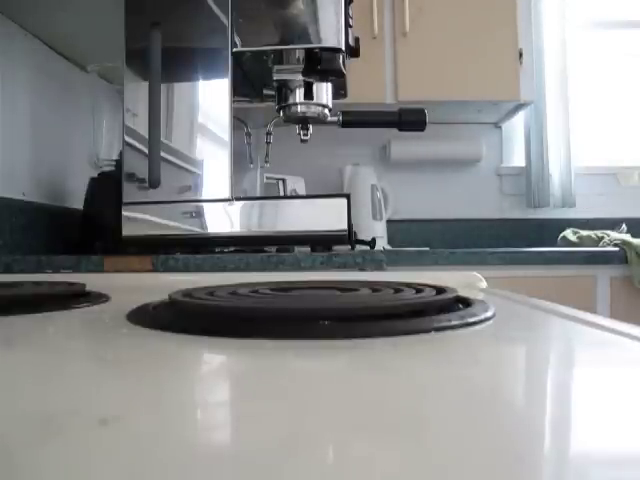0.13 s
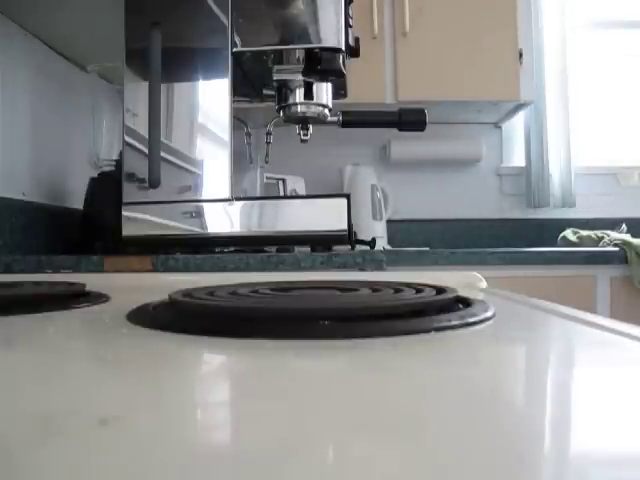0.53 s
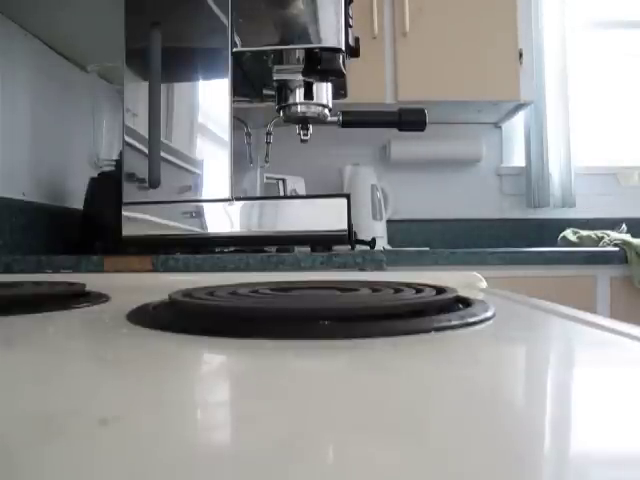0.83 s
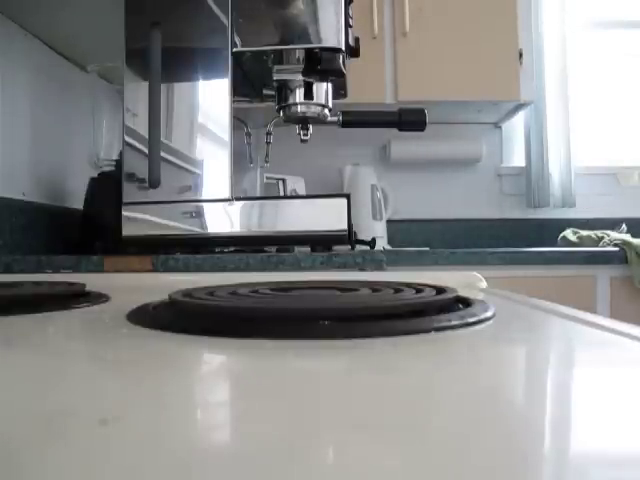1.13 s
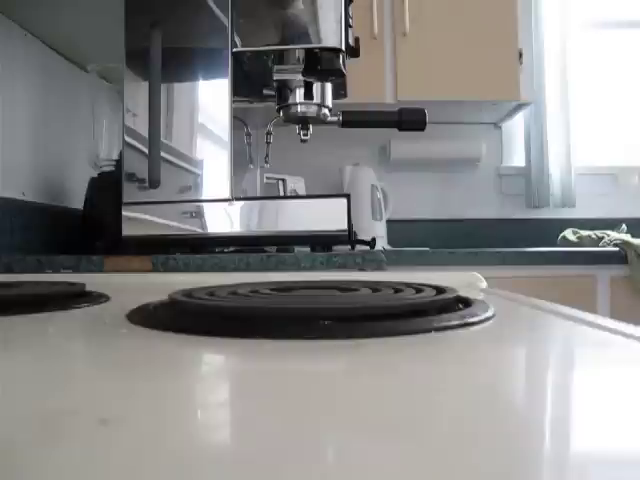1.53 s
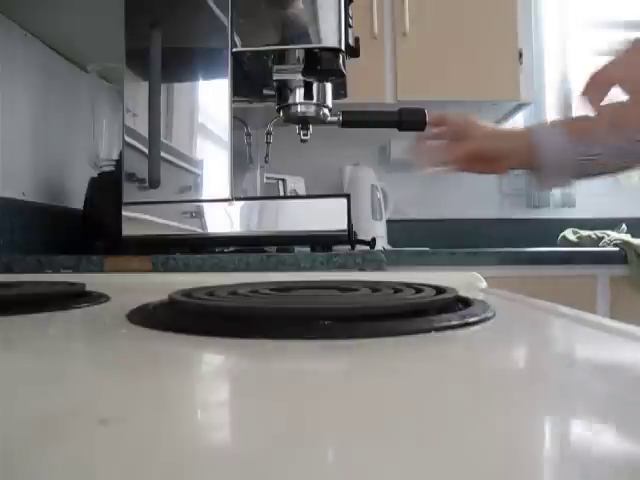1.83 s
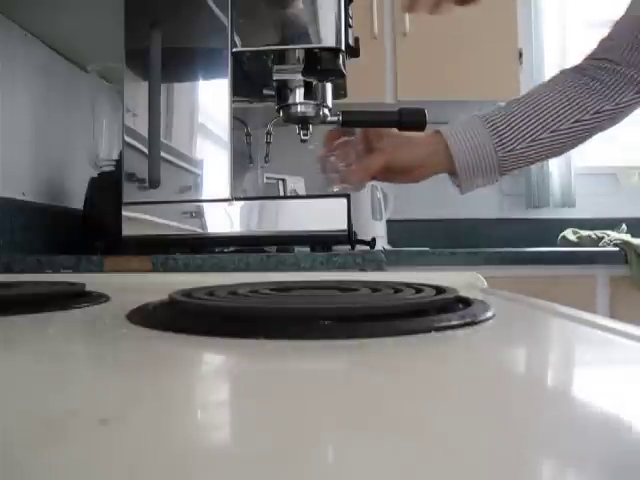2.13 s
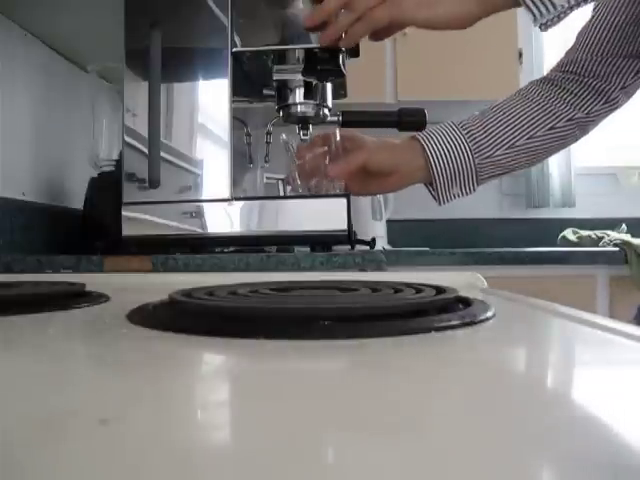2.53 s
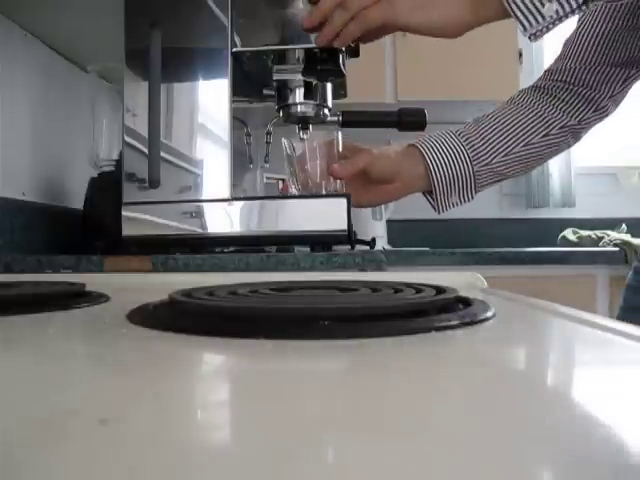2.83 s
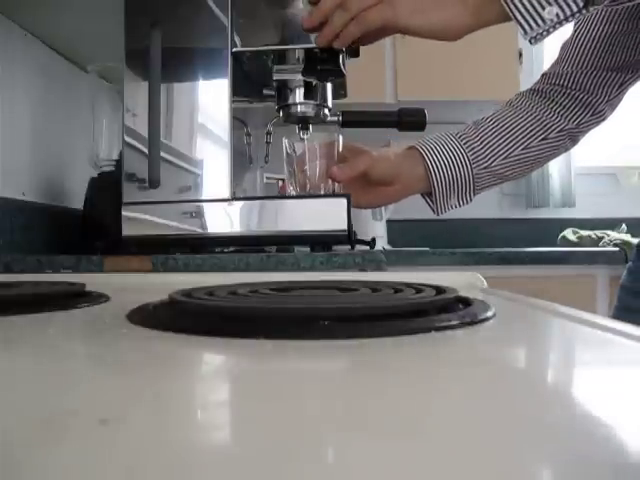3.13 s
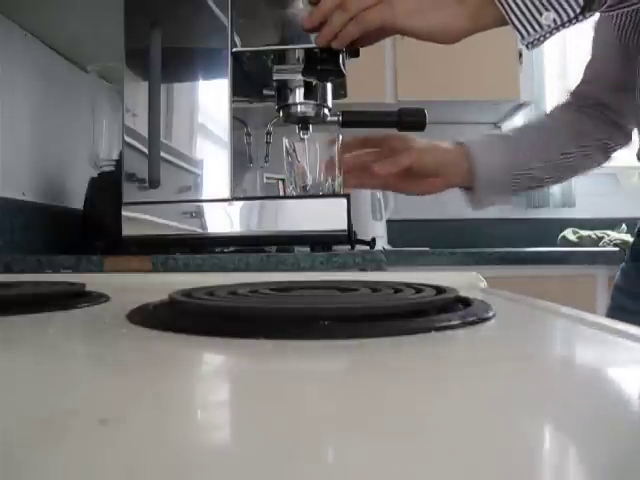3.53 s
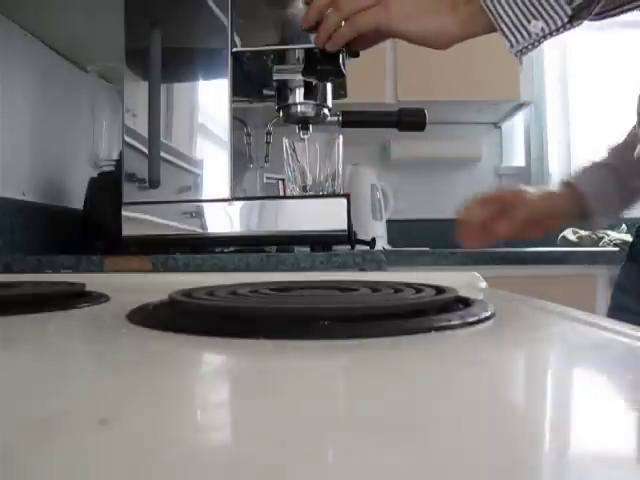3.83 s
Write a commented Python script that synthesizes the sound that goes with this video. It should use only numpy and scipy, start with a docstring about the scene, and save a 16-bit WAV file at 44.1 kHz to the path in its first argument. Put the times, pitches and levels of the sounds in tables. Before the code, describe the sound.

An espresso machine starts near the end of a quiet kitchen scene. Steady room hum with a thin appliance whine runs throughout. Faint shoe scuffs come early, clearest at 0.7-0.8 s, then soft steps and rustles until 2.3. At 2.57 a glass clinks brightly on metal; at 2.78 it lands with a hard, clattering knock. At 3.71 a switch snaps, a valve hisses, and from 3.75 a loud, rough pump buzz holds to the end.

```python
"""An espresso machine starts: a switch snaps, a valve hisses, and a motor hums on its shaft orders while
noise shaped by the casing throbs twice a turn. Before that someone shuffles up, clinks a glass on metal
and sets it on the drip tray: decaying modes give the ringing, coloured impulses and noise the contacts.
Behind them lie a steady kitchen hum of coloured noise and a thin appliance whine of wavering tones."""
import sys
import numpy as np
from scipy import signal
from scipy.fft import rfft, irfft
from scipy.io import wavfile

SR = 44100
rng = np.random.default_rng(int(sys.argv[2]) if len(sys.argv) > 2 else 0)


def to_wav(s):
    """Save 16-bit WAV."""
    ch = np.atleast_2d(s).T  # columns
    pcm = np.round(np.clip(ch, -1, 1) * 32767)  # PCM
    wavfile.write(sys.argv[1], SR, pcm.astype(np.int16))


N = 176400
TIME = np.arange(N) / SR  # s

# Every colour is a relative spectrum: its noise is scaled to rms 1 and its knocks to unit energy.
# Strong orders of the pump shaft: [multiple of the shaft rate, relative level/dB]
SHAFT_ORDERS = [(2, -57), (4, -49.5), (7, -51.5), (10, -51), (13, -52), (16, -61), (20, -51.5), (22, -52),
                (24, -50.5), (30, -54), (31, -56), (40, -59), (64, -49), (66, -43)]
# Response of the casing to the pump: [f/Hz, relative level/dB]
CASING_COLOUR = [(50, -24), (130, -13), (400, -6.5), (700, -5), (810, -8), (915, 4.5), (1060, -7),
                 (1220, 4), (1450, -22), (1750, -6), (1970, -4), (2120, -11), (2800, -8.5), (3600, -22),
                 (5800, -10), (10000, -29), (15000, -45)]
# Hiss of the valve against time: [t/s, level/dB]; its spectrum: [f/Hz, relative level/dB]
VALVE_LEVEL = [(3.713, -70), (3.72, -29.5), (3.755, -32), (3.775, -29.5), (3.82, -34), (3.87, -38.5),
               (4.0, -40)]
VALVE_SPECTRUM = [(300, -14), (1000, -5), (2800, -7), (3600, -8.5), (4600, -4.5), (5300, -8), (5850, -2.5),
                  (6500, -10), (8000, 0.5), (9800, -0.5), (10800, -7.5), (11800, -31), (13200, -17),
                  (16000, -32)]
# Contacts of the pump switch: [t/s, relative level/dB]; their spectrum: [f/Hz, relative level/dB]
SWITCH_CONTACTS = [(3.712, -18), (3.7134, -8), (3.714, -14.5), (3.7161, -14)]
SWITCH_COLOUR = [(200, -34), (1000, -13.5), (2800, -9), (3900, -10), (4800, 3.5), (6000, -9.5), (7500, -4),
                 (9500, 5), (10800, -3), (11900, -33), (13500, -11), (16000, -27)]
# Modes of the glass: [f/Hz, relative level/dB, t60/s]
GLASS_MODES = [(2229, -24.5, .19), (2278, -23.5, .33), (2339, -28, .2), (4451, -36, .34), (4490, -37, .18),
               (4535, -36, .18), (6974, -29.5, .24), (7051, -35, .22), (9800, -31, .13), (9836, -28.5, .19),
               (9915, -35, .13), (10160, -39, .2), (13142, -54, .14)]
# Modes of the metal spout that the glass first touches, led by a low thump of the machine casing near 117 Hz:
# [f/Hz, relative level/dB, t60/s]
SPOUT_MODES = [(117, -51, 0.36), (210, -40.5, .3), (492, -43.5, 0.29), (718, -35, 0.13), (783, -37.5, 0.28),
               (940, -38, 0.078), (990, -33, 0.11), (1090, -39, 0.053), (1245, -30.5, 0.084)]
# Contact noise of glass on spout: [f/Hz, relative level/dB]
CONTACT_COLOUR = [(80, -15), (300, -6.5), (800, 4.5), (1250, -4), (1600, -23), (2400, 4.5), (3500, -24),
                  (4500, 3), (5800, -25), (10000, -14), (12000, -38), (16000, -44)]
# The base of the glass lands and rocks on the tray: [t/s, relative level/dB]
BASE_LANDINGS = [(2.7811, -1), (2.7822, -1.5), (2.7852, 2.5), (2.791, -2.5)]
# Modes of the drip tray: [f/Hz, relative level/dB, t60/s]
TRAY_MODES = [(442, -47.5, .35), (1040, -38, 0.028), (1116, -24.5, 0.084), (1363, -34.5, .12),
              (1770, -28, 0.047), (2530, -43, .2), (2745, -37, .3), (4334, -39, .3), (5070, -46, 0.24)]
# Contact noise of glass on tray: [f/Hz, relative level/dB]
TRAY_CONTACT_COLOUR = [(70, -23), (200, -10), (480, 0.5), (700, -8), (1100, 1), (1500, -0.5), (2100, 1),
                       (2900, -0.5), (3800, -7), (4600, -5.5), (6200, -13), (8000, -7.5), (9800, -6),
                       (11000, -13.5), (12000, -28), (16000, -26)]
# Shoe scuffs: [start t/s, rise/s, decay/s, level/dB]; their spectrum: [f/Hz, relative level/dB]
SHOE_SCUFFS = [(0, 0.0018, 0.035, -48), (.16, 0.044, 0.043, -47), (.21, 0.044, 0.058, -49.5),
               (.70, .018, 0.015, -40), (.779, 0.0092, 0.014, -34)]
SHOE_COLOUR = [(200, -23), (700, -12), (1200, -6), (1500, -0.5), (1650, 0.5), (2100, -3), (2800, -9.5),
               (3600, -8.5), (4500, -7), (5600, -9.5), (6500, -19), (10000, -19), (12000, -46),
               (16000, -40)]
# Soft steps and floor creaks: [start t/s, rise/s, decay/s, level/dB]; spectrum: [f/Hz, relative level/dB]
SOFT_STEPS = [(1.01, 0.032, .035, -47.5), (1.14, 0.0053, 0.0091, -50), (1.661, .006, 0.021, -38.5),
              (1.86, 0.0036, 0.0065, -50), (2.0, 0.0015, 0.0055, -50.5), (2.032, 0.0022, 0.0062, -51.5),
              (2.075, 0.0028, 0.0092, -49.5), (2.135, 0.0025, .008, -47), (2.185, 0.0046, .008, -48.5),
              (2.24, 0.0044, .007, -49.5), (2.303, .003, .007, -51)]
FLOOR_COLOUR = [(100, -21), (280, -10), (560, 2.5), (1000, -4.5), (1700, -6.5), (2500, -14.5), (6000, -19),
                (10500, -20), (12000, -42), (16000, -45)]
# Sleeve rustles, finger touches: [start t/s, rise/s, decay/s, level/dB]; spectrum: [f/Hz, relative level/dB]
SLEEVE_RUSTLES = [(.458, 0.012, 0.046, -47.5), (1.12, 0.025, 0.042, -50.5), (1.58, 0.0089, .012, -54),
                  (3.082, .008, 0.031, -47.5), (3.618, 0.0034, 0.015, -46.5)]
SLEEVE_COLOUR = [(200, -5), (2200, -1.5), (6000, -9), (10300, -4.5), (11800, -26), (13500, -21),
                 (16000, -35)]
# Air stirred at the microphone: [start t/s, rise/s, decay/s, level/dB]; spectrum: [f/Hz, relative level/dB]
AIR_PUFFS = [(1.47, .035, .055, -56), (1.75, 0.036, 0.019, -59), (2.315, .02, 0.037, -52)]
AIR_PUFF_COLOUR = [(15, -13), (30, 10), (60, -12), (130, -26), (500, -60), (2000, -90)]
# Steady tones of the appliances: [f/Hz, relative level/dB]
APPLIANCE_TONES = [(206, -68.5), (414.5, -66.5), (942, -69), (1589, -63.5), (1884, -73), (2487, -63.5),
                   (2912, -64.5), (3003, -62), (3660, -68.5), (3784, -80.5), (4167, -66), (4640, -66),
                   (6804, -71.5), (7117, -87), (9230, -67.5), (9530, -73.5)]
# Even room noise: [f/Hz, relative level/dB]
ROOM_COLOUR = [(12, -21), (25, -4.5), (60, -2.5), (140, -7.5), (210, -1.5), (300, -2), (420, -4),
               (570, 0.5), (750, -8.5), (1300, -9), (1620, -4), (1900, -5), (2200, -13), (2650, -7),
               (2930, 2.5), (3250, -13.5), (3650, -5.5), (4300, -9), (4700, -0.5), (5200, -6.5),
               (5600, -9.5), (6300, -13.5), (7000, -9), (8700, -9.5), (9400, -7.5), (10000, -9),
               (10700, -10), (11700, -38), (13000, -25), (16000, -35)]
# Reverberation of the kitchen: [f/Hz, t60/s]
KITCHEN_DECAY = [(100, 0.73), (500, 0.78), (1400, 0.52), (3700, 0.64), (9700, 0.48), (16000, 0.22)]

PUMP_S, FADE_IN_S, SHAFT_HZ = 3.75, 0.011, 29.92
CASING_DB, THROB_DEPTH = -35, 0.18
FRESH_SHARE = 0.54  # share of the shaking power that does not repeat each turn
CLINK_S, CLINK_TICK_DB, GLASS_DB = 2.572, -28.5, -2
TRAY_DB, TRAY_RING_DB, CLATTER_DB, CLATTER_S = -0.5, 1.5, -23.5, 0.0094
WHINE_WIDTH_HZ, STEADY_SHARE = 9, 0.68  # share of the tone power that does not waver
ROOM_DB, CUTOFF_HZ = -52.5, 15900


def pump(level_db=-1, waver=0.7, waver_hz=14):
    """Forced vibration: shaft harmonics, plus partly periodic noise filtered by the casing response."""
    turns = SHAFT_HZ * TIME
    running = np.clip((TIME - PUMP_S) / FADE_IN_S, 0, 1)
    hum = 0
    for multiple, db in SHAFT_ORDERS:
        wavering = unit(1 + waver * drift(waver_hz))
        phase = round(multiple) * turns + rng.random()
        hum = hum + np.sqrt(2) * amp(db) * (wavering * np.exp(2j * np.pi * phase)).real
    count = 1474  # samples in one turn
    one_turn = rng.standard_normal(count)
    repeating = one_turn[(turns % 1 * count).astype(int)]
    shake = np.sqrt(1 - FRESH_SHARE) * repeating + np.sqrt(FRESH_SHARE) * rng.standard_normal(N)
    rattle = amp(CASING_DB) * tint(shake * throb(), CASING_COLOUR)
    return running * (amp(level_db) * hum + rattle)


def throb():
    """Amplitude modulation at twice the shaft rate, common to the casing and the valve."""
    return 1 + THROB_DEPTH * np.cos(4 * np.pi * SHAFT_HZ * TIME)


def valve(flutter_db=-0.5):
    """Flow noise: a broadband hiss with a falling, fluttering level, modulated by the throb."""
    level_db = np.interp(TIME, *np.transpose(VALVE_LEVEL), left=-120)
    return amp(level_db + flutter_db * drift(70).real) * noise(VALVE_SPECTRUM) * throb()


def switch():
    """Contact impact: hard, bright bursts within five milliseconds, reflected by the casing."""
    envelope = sum(amp(db) * swell(start, 0.00043, 0.00092) for start, db in SWITCH_CONTACTS)
    return kitchen(envelope * noise(SWITCH_COLOUR), early_db=-7, tail_db=-10.5, early_s=0.0067)


def clink():
    """Modal excitation: rim on spout rings close groups of glass modes over a short metal knock."""
    contact = [(CLINK_S, 0.001, 0.008, CLINK_TICK_DB)]
    tick = rubs(contact, CONTACT_COLOUR, grain_db=-4, room_db=1.5, room_t60=0.3)
    glass = kitchen(ring(GLASS_MODES, CLINK_S), early_db=-14, tail_db=-9.5)
    spout = kitchen(ring(SPOUT_MODES, CLINK_S), early_db=-11.5, tail_db=-9)
    return tick + amp(GLASS_DB) * glass + spout


def set_down():
    """Repeated impact: the base lands and chatters on the tray, whose sheet-metal modes ring."""
    first = BASE_LANDINGS[0][0]
    impacts = knocks(BASE_LANDINGS, TRAY_CONTACT_COLOUR)
    crack = amp(TRAY_DB) * kitchen(impacts, early_db=4, tail_db=-2, early_s=0.005)
    contact = [(first, 0.002, CLATTER_S, CLATTER_DB)]
    chatter = rubs(contact, TRAY_CONTACT_COLOUR, grain_db=3.5, room_db=0.5, room_t60=0.53)
    ringing = amp(TRAY_RING_DB) * ring(TRAY_MODES, first)
    return crack + chatter + kitchen(ringing, early_db=-16, tail_db=-11)


def person():
    """Friction noise of feet and sleeve, with low-frequency turbulence of stirred air."""
    scuffs = rubs(SHOE_SCUFFS, SHOE_COLOUR, grain_db=1, room_db=0.5)
    steps = rubs(SOFT_STEPS, FLOOR_COLOUR, grain_db=3.5, room_db=-1)
    sleeve = rubs(SLEEVE_RUSTLES, SLEEVE_COLOUR, grain_db=6.5, room_db=-2)
    puffs = rubs(AIR_PUFFS, AIR_PUFF_COLOUR, grain_db=6, room_db=-20)
    return scuffs + steps + sleeve + puffs


def room_hum(waver_db=3.24, whine_db=1):
    """Stationary noise with slow level drift, and narrow-band tones: steady carrier plus random part."""
    tones = 0
    for hz, db in APPLIANCE_TONES:
        strength = np.sqrt(STEADY_SHARE) + np.sqrt(1 - STEADY_SHARE) * drift(WHINE_WIDTH_HZ)
        tones = tones + amp(db) * (strength * np.exp(2j * np.pi * hz * TIME)).real
    hum = amp(ROOM_DB + waver_db * drift(1.7).real) * noise(ROOM_COLOUR)
    return hum + amp(whine_db) * np.sqrt(2) * tones


def kitchen(x, early_db, tail_db, early_s=0.014):
    """Room response: direct sound, sparse reflections of counter and casing, frequency-dependent tail."""
    count = 30000
    t = np.arange(count) / SR
    sparse = rng.random(count) < 1500 / SR  # about 1500 reflections per second
    early = rng.standard_normal(count) * sparse * np.exp(-t / early_s) * (t > 0.001)
    hz, at, z = signal.stft(rng.standard_normal(count), SR, nperseg=256)
    decay = amp(-60 * at / read(KITCHEN_DECAY, hz)[:, None])
    tail = signal.istft(z * decay, SR, nperseg=256)[1][:count]
    tail = tail * np.minimum(t / 0.012, 1)
    echo = amp(early_db) * early / np.linalg.norm(early) + amp(tail_db) * tail / np.linalg.norm(tail)
    total_gain = np.sqrt(1 + amp(early_db) ** 2 + amp(tail_db) ** 2)
    return (x + signal.fftconvolve(x, echo)[:N]) / total_gain


def rubs(rows, colour, grain_db, room_db, room_t60=0.65):
    """Friction: swells of grainy noise, their power prolonged by exponential room decay."""
    power = sum(amp(db) * swell(start, rise, decay) for start, rise, decay, db in rows) ** 2
    keep = np.exp(-np.log(1e6) / (room_t60 * SR))  # power kept per sample
    echo = amp(room_db) ** 2 * signal.lfilter([1 - keep], [1, -keep], power)
    grain = unit(amp(grain_db * drift(150).real))
    return np.sqrt(power + echo) * noise(colour) * grain


def ring(modes, start):
    """Modal superposition: exponentially decaying sines struck at one moment."""
    t = np.arange(SR) / SR
    sound = np.zeros(SR)
    for hz, db, t60 in modes:
        sound += amp(db - 60 * t / t60) * np.sin(2 * np.pi * (hz * t + rng.random()))
    return np.concatenate([np.zeros(round(start * SR)), sound, np.zeros(N)])[:N]


def knocks(rows, colour):
    """Minimum-phase impulses: each starts at once and dies with the given spectrum."""
    count = 4096
    log_gain = np.log(amp(read(colour, abs(np.fft.fftfreq(count, 1 / SR)))))
    # the Hilbert transform of the log gain gives the minimum phase
    click = np.fft.ifft(np.exp(np.conj(signal.hilbert(log_gain)))).real
    hits = np.zeros(N)
    for start, db in rows:
        hits[round(start * SR)] += amp(db)
    return signal.fftconvolve(hits, click / np.linalg.norm(click))[:N]


def swell(start, rise, decay):
    """Transient envelope: linear attack, exponential release."""
    t = TIME - start
    return np.clip(t / rise, 0, 1) * np.exp(-np.maximum(t - rise, 0) / decay)


def drift(hz):
    """Low-pass random process: complex, rms 1, varying up to about hz."""
    count = 2048
    f = np.fft.fftfreq(count, N / SR / count)
    white = rng.standard_normal(count) + 1j * rng.standard_normal(count)
    slow = unit(np.fft.ifft(white / (1 + (f / hz) ** 2)))
    return np.interp(TIME, np.linspace(0, N / SR, count), slow)


def noise(colour):
    """Stationary random noise with a given spectrum."""
    return tint(rng.standard_normal(N), colour)


def tint(x, colour):
    """Linear filtering: shapes the spectrum of a steady sound, at rms 1."""
    gain = amp(read(colour, np.fft.rfftfreq(N, 1 / SR)))
    return unit(irfft(rfft(x) * gain, N))


def read(points, hz):
    """Interpolation of a table on a logarithmic frequency axis."""
    f, value = np.transpose(points)
    return np.interp(np.log(hz + 1), np.log(f + 1), value)


def unit(x):
    """Normalisation to rms 1."""
    return x / np.sqrt(np.mean(abs(x) ** 2) + 1e-20)


def amp(db):
    """Logarithmic level: decibels to amplitude gain."""
    return 10 ** (np.asarray(db) / 20)


def scene():
    """Superposition of all sources at one microphone."""
    machine = pump() + valve() + switch()
    return (machine + clink() + set_down() + person() + room_hum())[None]


def record(dry):
    """Band limitation: a linear-phase low-pass filter sets the upper limit of the recorder."""
    lowpass = signal.firwin(511, CUTOFF_HZ, window=("kaiser", 9), fs=SR)
    return signal.oaconvolve(dry, lowpass[None], "same")


dry = scene()
out = record(dry)
to_wav(out)
```